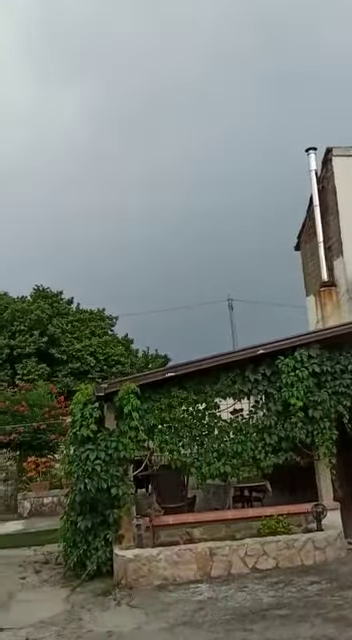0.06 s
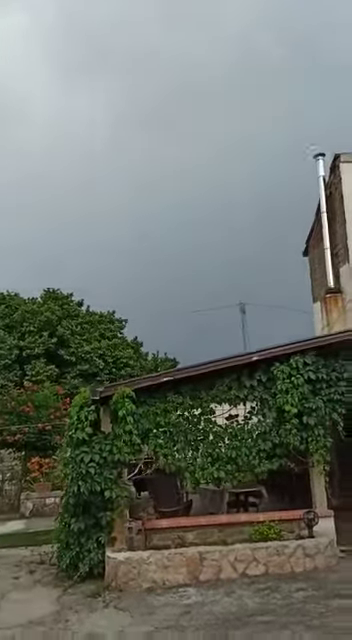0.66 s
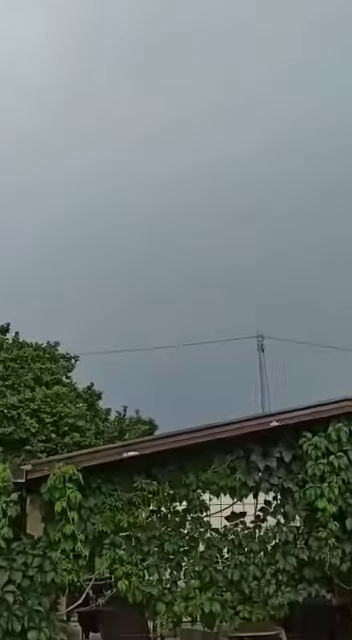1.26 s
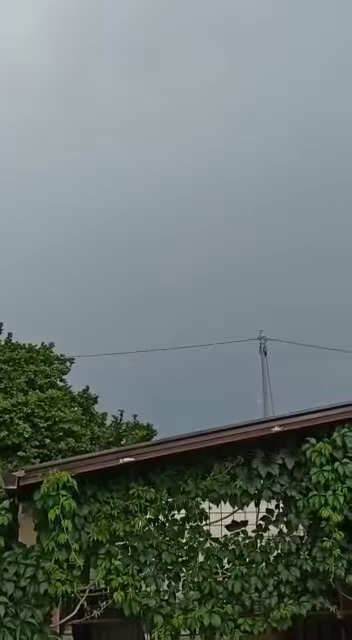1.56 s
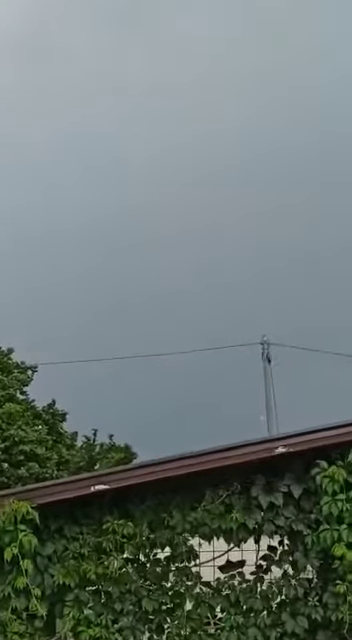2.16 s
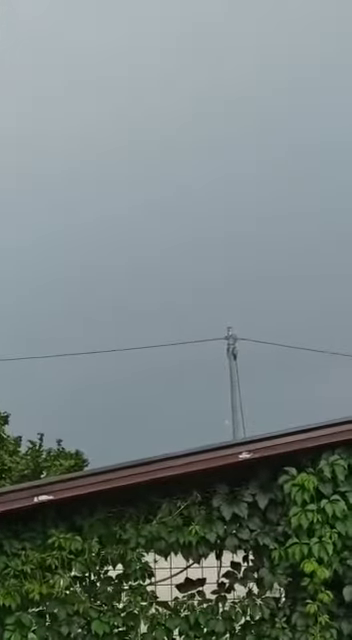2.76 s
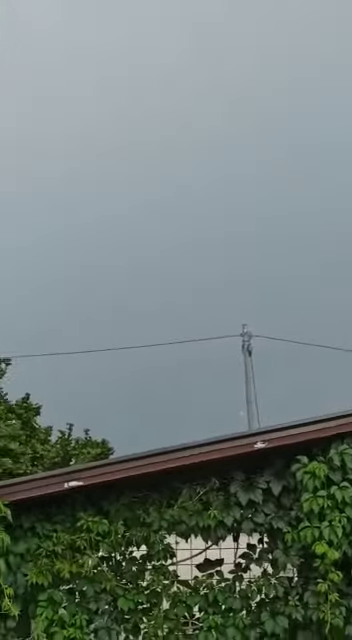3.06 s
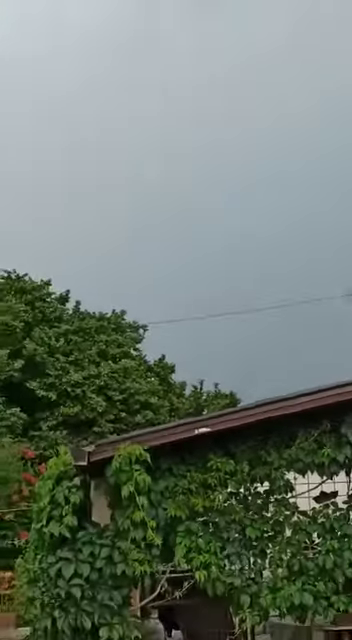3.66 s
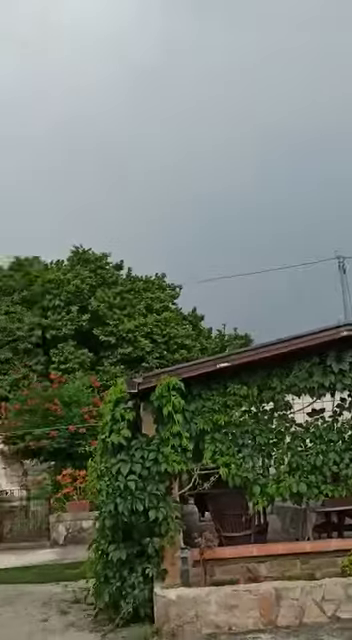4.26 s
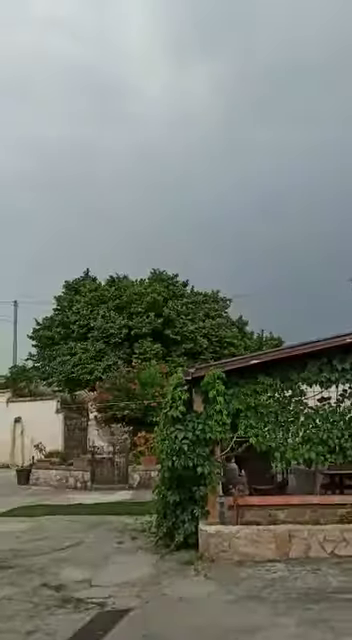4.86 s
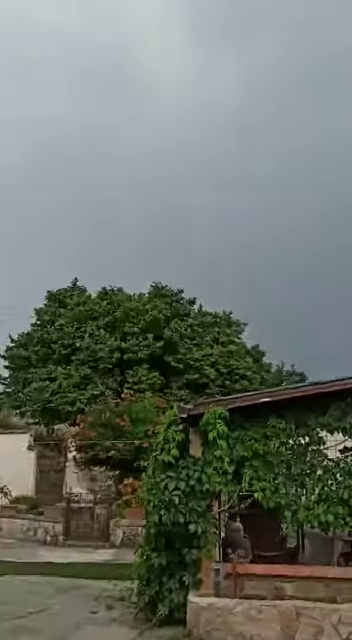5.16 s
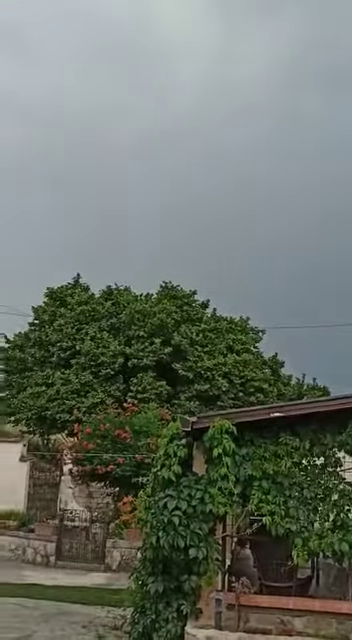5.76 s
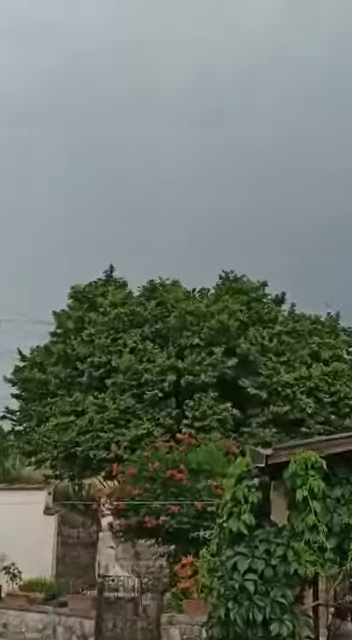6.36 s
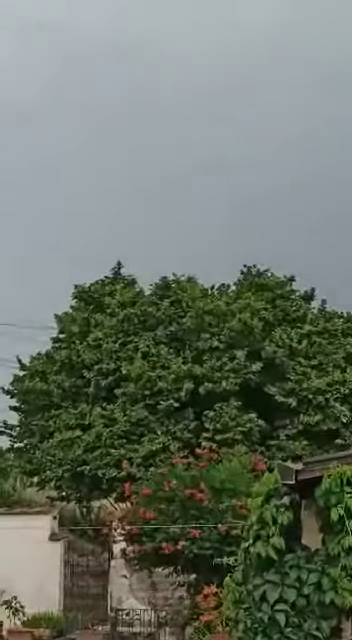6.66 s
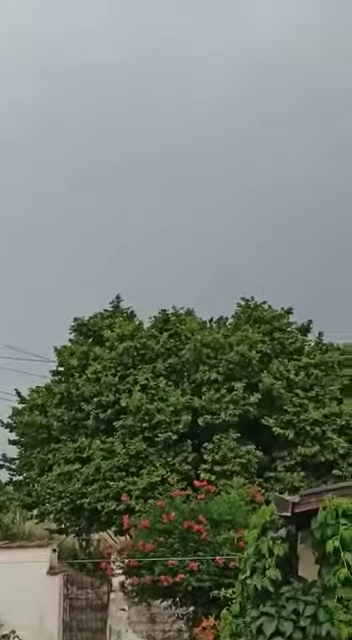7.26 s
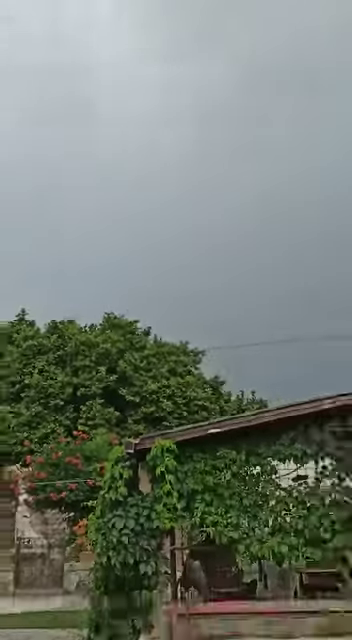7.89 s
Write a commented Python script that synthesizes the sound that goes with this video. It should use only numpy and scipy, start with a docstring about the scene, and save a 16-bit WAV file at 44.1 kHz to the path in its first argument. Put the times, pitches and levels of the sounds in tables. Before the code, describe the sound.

A vehicle drones closer, rattles past and pulls away with a booming exhaust, then another hums up with roaring tyres.

```python
"""A low, swelling rumble much like thunder: motor traffic rolling past a walled yard.
One vehicle drones closer, rattles by at three seconds and pulls away, its exhaust booming in swells
between the walls. A second follows with a softer engine hum, and the tyres of each roar and hiss on
the road. A few dry ticks sound near the microphone, and a bird peeps far off."""
import sys
import numpy as np
from scipy import signal
from scipy.fft import rfft, irfft
from scipy.io import wavfile
from scipy.ndimage import uniform_filter1d

SR = 44100
rng = np.random.default_rng(int(sys.argv[2]) if len(sys.argv) > 2 else 0)


def materialize(psi):
    """Save the field psi as 16-bit PCM at rate SR to the path in sys.argv[1].

    A 1-D psi becomes a single channel; in a 2-D psi each row is a channel.
    """
    bounded = np.clip(np.atleast_2d(psi).T, -1, 1)
    quanta = np.round(bounded * 32767).astype(np.int16)
    wavfile.write(sys.argv[1], SR, quanta)


N = 358533
TIME = np.arange(N) / SR
FIRST_PASS_S, SECOND_PASS_S = 3.078, 7.436  # when each vehicle is closest


def first_engine(octave_trim_db=-1, jitter_hz=0.611):
    """An exhaust boom, its even harmonics and rougher overtones, all locked to one unsteady crankshaft."""
    # The revs climb as it pulls away. Each row: time in seconds, firing rate in Hz.
    firing = [(2.82, 72.95), (2.98, 78.75), (3.07, 80.7), (3.3, 77.3), (3.6, 77.13), (3.95, 78.5),
              (4.3, 77.7), (4.8, 80.2), (5.0, 80.6), (5.25, 82.6), (5.6, 82.7), (5.8, 83.7), (6.2, 84.95),
              (7, 90.8), (8.13, 92.5)]
    # The boom swells between the walls. Each row: start and length in seconds, level in dB,
    # rise and fall in seconds.
    booms = [(2.599, 0.2, -36, 0.067, 0.071), (2.758, 0.65, -19.5, 0.37, 0.13),
             (3.27, .64, -22, 0.25, 0.15), (3.817, 0.22, -37, .06, 0.051), (4.004, 0.96, -23, 0.15, 0.23),
             (4.702, 0.88, -22.5, 0.63, 0.36), (5.483, 0.89, -21.5, 0.33, 0.32),
             (6.204, 0.55, -35.5, 0.13, 0.095), (6.72, 0.52, -38.5, 0.11, 0.12),
             (7.221, 1.15, -37, 0.13, .1)]
    # Swells of the octave. Each row: start and length in seconds, level in dB before the trim.
    octave_swells = [(2.892, 0.5, -25), (3.4, 0.38, -26), (3.725, 0.6, -28), (4.497, 0.47, -36.5),
                     (4.888, 0.28, -31), (5.173, 0.24, -24), (5.34, 0.31, -32), (5.562, 0.38, -26),
                     (6.08, 0.4, -35)]
    # The fourth harmonic comes and goes. Each row: start and length in seconds, level in dB.
    fourth_swells = [(3.525, 0.29, -32.5), (3.87, 0.34, -34.5), (4.375, 0.26, -27.5), (4.623, 0.42, -39),
                     (5.694, 0.35, -41)]
    # The machine's growl. Each row: multiple of the firing rate, relative level in dB, roughness 0-1.
    overtones = [(1.335, -10.5, .9), (1.498, -15.5, 0.6), (2.55, -14, 0.7), (2.87, -6, .6), (3.06, -3, .8),
                 (3.69, -1.5, 0.48), (4.05, -8.5, .6), (4.33, -11.5, 0.7)]
    turns = np.cumsum(follow(firing) + jitter_hz * wander(9.1)) / SR
    boom = swells(booms) * tone(turns, rough=0.075, flutter_hz=9.8)
    octave = swells(octave_swells, rise=0.088, fall=0.14) * tone(2 * turns, rough=0.18, flutter_hz=13)
    fourth = swells(fourth_swells, rise=0.11, fall=0.18) * tone(4 * turns, rough=0.42, flutter_hz=22)
    growl = sum(gain_of(db) * tone(k * turns, rough, flutter_hz=6.9) for k, db, rough in overtones)
    growl *= passing(FIRST_PASS_S, peak_db=-32, near_s=1.61, ahead=16.6, behind=1.67)
    return boom + gain_of(octave_trim_db) * octave + fourth + growl


def drive_train(panel_hz=438, panel_db=-19):
    """A drone, loudest as the first vehicle draws level, a higher ring it shakes loose, and a whirr."""
    # The drone's pitch. Each row: time in seconds, pitch in Hz.
    drone_pitch = [(1.3, 213), (1.8, 210), (2.3, 225), (2.5, 227.7), (2.7, 219.1), (2.95, 216.3),
                   (3.15, 224.9), (3.35, 220.4), (3.6, 218.8), (4.4, 223.2), (4.7, 227.5), (5.1, 235)]
    # Its swells. Each row: start and length in seconds, level in dB.
    drone_swells = [(1.227, 0.83, -42), (2.26, 0.41, -27.5), (2.534, .16, -30), (2.72, 0.51, -21),
                    (3.003, 0.15, -23.5), (3.21, 0.412, -23.5), (4.47, 0.34, -29), (4.802, 0.38, -40)]
    # A close whirr, perhaps the cooling fan. Each row: pitch in Hz, relative level in dB.
    whirr_tones = [(436, -37.5), (516, -38.5)]
    drone = glide(drone_pitch, rough=0.11, flutter_hz=30)
    panel = gain_of(panel_db) * tone(panel_hz * TIME, rough=0.56, flutter_hz=38)
    whirr = sum(gain_of(db) * tone(hz * TIME, rough=0.99, flutter_hz=6.4) for hz, db in whirr_tones)
    whirr *= passing(3.33, peak_db=1, near_s=0.51, ahead=4.1, behind=2.16)
    return swells(drone_swells, rise=0.068, fall=0.07) * (drone + panel) + whirr


def rumble():
    """Body and road rumble: a wake lingering behind each vehicle, gusts ahead of the first, a far bed."""
    # Colours of the wake, gusts and bed. Each row: frequency in Hz, relative density in dB.
    wake_colour = [(20, -23), (40, -32), (60, -11), (85, -1.5), (130, -1), (180, 1.5), (250, -1.5),
                   (310, -3.5), (400, -11), (650, -34.5), (1500, -84.5)]
    gust_colour = [(20, -29), (55, -25), (85, -3.5), (120, 3.5), (180, -2), (260, -8.5), (400, -27),
                   (1500, -88)]
    bed_colour = [(20, -25.5), (40, -29), (60, -11.5), (85, -4), (130, -2.5), (160, -1), (200, 0.5),
                  (235, 0), (270, -7), (400, -14), (650, -36), (1500, -80.5)]
    # The low gusts. Each row: start and length in seconds, level in dB, rise and fall in seconds.
    gust_swells = [(1.05, 1.37, -42, 0.31, .2), (2.1, 0.75, -31.5, 0.52, 0.23)]
    first = passing(FIRST_PASS_S, peak_db=-23.5, near_s=0.17, ahead=1.02, behind=0.6)
    first *= emerging(start=1.17, rise=0.28, hidden_db=-11)
    second = passing(SECOND_PASS_S, peak_db=-37.5, near_s=0.52, ahead=1.6, behind=0.1)
    wake = np.hypot(first, second) * noise(wake_colour, patchy_db=3, size=4096)
    gusts = swells(gust_swells) * noise(gust_colour, patchy_db=-1.5, size=4096)
    bed = gain_of(-41) * noise(bed_colour, patchy_db=1, size=4096)
    return wake + gusts + bed


def tyres(far_roar_db=-48, far_hiss_db=-71, grit_db=0.5):
    """Tyre roar and hiss rise and fall with each vehicle's distance; grit makes the hiss flicker."""
    # Colours of roar and hiss; the first vehicle passes closer, so its hiss is brighter.
    # Each row: frequency in Hz, relative density in dB.
    first_roar_colour = [(100, -32.5), (280, -8), (430, -0.5), (570, -1.5), (740, -3.5), (950, -6),
                         (1400, -11.5), (2100, -14), (2700, -27), (4500, -68)]
    second_roar_colour = [(100, -18), (280, -8), (430, 3), (700, 1.5), (950, 0.5), (1250, -1.5), (1550, -5),
                          (2100, -7.5), (2700, -23.5), (4500, -83.5)]
    bright_hiss_colour = [(900, -23.5), (2000, 5.5), (2800, 5), (4300, 5), (5300, -7.5), (6700, 2),
                          (8100, -1.5), (9200, -24.5), (10500, -41), (12500, -13), (16000, -24)]
    hiss_colour = [(900, -17.5), (2000, 4.5), (2800, 4.5), (4300, 4), (5300, -9.5), (6700, -0.5),
                   (8100, -8.5), (9500, -43), (12500, -25), (16000, -22.5)]
    # Brief surges, as over rougher ground. Each row: start and length in seconds,
    # roar and hiss levels in dB, rise and fall in seconds.
    surges = [(1.663, 0.36, -41, -48, 0.069, 0.23), (2.172, 0.65, -39, -47.5, 0.21, 0.092),
              (2.9, 0.22, -26, -42, 0.12, 0.11), (3.032, 0.29, -35, -45.5, .08, 0.18),
              (3.15, 0.56, -35.5, -51, .1, 0.32), (6.596, 0.57, -39, -48, 0.27, 0.27),
              (7.25, 0.56, -39, -57, 0.18, 0.23)]
    roar_surges = sum(swell(s, length, db, rise, fall) for s, length, db, _, rise, fall in surges)
    hiss_surges = sum(swell(s, length, db, rise, fall) for s, length, _, db, rise, fall in surges)

    first_roar = passing(FIRST_PASS_S, peak_db=-27, near_s=0.58, ahead=2.52, behind=1.284)
    second_roar = passing(SECOND_PASS_S, peak_db=-36, near_s=1.21, ahead=1.1, behind=1.9)
    second_roar *= emerging(start=4.22, rise=1.3, hidden_db=-30.5)
    roar = np.hypot(first_roar, gain_of(far_roar_db)) * noise(first_roar_colour, 0.98, size=2048)
    roar += np.hypot(second_roar, roar_surges) * noise(second_roar_colour, patchy_db=0.7)

    first_hiss = passing(FIRST_PASS_S, peak_db=-39.5, near_s=0.4, ahead=1.62, behind=1.3)
    alongside = swell(start=2.88, length=0.44, db=-40.5, rise=0.12, fall=0.2)
    second_hiss = passing(SECOND_PASS_S, peak_db=-48, near_s=1, ahead=1, behind=3.3)
    hiss_level = np.sqrt(second_hiss ** 2 + hiss_surges ** 2 + gain_of(far_hiss_db) ** 2)
    hiss = hiss_level * noise(hiss_colour, patchy_db=1.2)
    hiss += np.hypot(first_hiss, alongside) * noise(bright_hiss_colour, patchy_db=1.4)
    return roar + hiss * gain_of(grit_db * wander(70))


def body_rattle(jolts_per_s=280, jolt_rise_s=0.004, jolt_t60=0.055, spread_db=1):
    """The first vehicle's body shakes in a dense run of uneven, dull jolts, heard only close by."""
    # The rattling body's colour. Each row: frequency in Hz, relative density in dB.
    body_colour = [(150, -32), (280, -9), (420, -1), (600, 2), (850, -8), (1300, -24), (2600, -69)]
    hits = rng.random(N) < jolts_per_s / SR
    sizes = np.minimum(rng.exponential(1, N), 3)
    t = np.arange(SR // 5) / SR
    jolt = fade_in(t / jolt_rise_s) * gain_of(-60 * t / jolt_t60)
    shaking = signal.oaconvolve(hits * gain_of(spread_db * sizes), jolt)[:N]
    rattle = unit_rms(shaking * noise(body_colour, patchy_db=2.5))
    return swell(start=3, length=0.66, db=-30.5, rise=0.17, fall=0.3) * rattle


def second_engine(cruise_hz=57.47, ease_off_s=6.55, sag_hz_per_s=2.046):
    """The second vehicle hums in swells and eases off as it comes near."""
    # Swells of the hum. Each row: start and length in seconds, level in dB, rise and fall in seconds.
    hum_swells = [(4.5, 1.65, -45.5, 0.62, .3), (5.696, 1.48, -35, 0.51, 0.83), (6.748, 1.89, -34, 0.62, 1)]
    firing_hz = cruise_hz - sag_hz_per_s * np.maximum(TIME - ease_off_s, 0)
    return swells(hum_swells) * cruising_hum(firing_hz, fundamental_db=-11, third_db=-7.5, fourth_db=-15)


def cruising_hum(firing_hz, fundamental_db, third_db, fourth_db):
    """An engine at light load: the second harmonic carries the hum, the others sit below it."""
    turns = np.cumsum(firing_hz) / SR
    hum = tone(2 * turns, rough=0.17, flutter_hz=8.8)
    hum += gain_of(fundamental_db) * tone(turns, rough=0.15, flutter_hz=4)
    hum += gain_of(third_db) * tone(3 * turns, rough=0.6, flutter_hz=9)
    hum += gain_of(fourth_db) * tone(4 * turns, rough=0.45, flutter_hz=3.8)
    return hum


def tread_song(width_hz=130, stereo_spread=0.22):
    """The tread pattern sings on the road: a fuzzy band whose centre moves with speed and angle."""
    # The band's path. Each row: time in seconds, centre in Hz, level in dB.
    band = [(3.6, 901.6, -50.5), (4.6, 919, -45), (5.6, 910, -55), (6.4, 911.4, -48.5), (6.95, 1016, -39.5),
            (7.2, 1050, -42.5), (7.55, 757.5, -41.5), (8.13, 768.4, -45)]
    carrier = np.exp(2j * np.pi * np.cumsum(follow(band)) / SR)
    middle, side = (unit_rms((carrier * flutter(width_hz)).real) for _ in range(2))
    return fader(band) * np.array([middle + stereo_spread * side, middle - stereo_spread * side])


def ticks(knock_hz=470, knock_t60=0.005, knock_delay_s=0.00077,
          rasp_t60=0.009, scatter_db=-39, scatter_t60=0.15):
    """Each close tick is a brief ring, a dull knock and a dry rasp; faint rustles lie around the first."""
    # The ticks. Each row: start in seconds, level in dB, ring pitch in Hz, ring t60 and attack
    # in seconds, knock and rasp in dB relative to the ring.
    hits = [(0.109, -32, 4400, 0.006, .0002, -25, -20), (0.1106, -33, 4600, 0.005, .0003, -25, -17),
            (0.4808, -29, 3000, .002, .0002, -10, -22), (0.4848, -12.5, 2900, 0.002, 0.00014, -2.5, -41),
            (4.3191, -16.5, 4200, 0.0028, .0005, -28, -29)]
    # The rustles. Each row: start and length in seconds, level in dB.
    rustles = [(0, 0.19, -55), (0.442, 0.23, -56.5), (.76, 0.15, -61), (1.145, 0.19, -60)]
    # The dry rasp of both. Each row: frequency in Hz, relative density in dB.
    rasp_colour = [(500, -26), (2000, 1.5), (4200, -3.5), (5300, -11), (6500, 1.5), (8200, -6), (9500, -38),
                   (12500, -14), (16000, -11)]
    rasp = noise(rasp_colour, patchy_db=2.5, size=256)
    out = rasp * swells(rustles, rise=0.034, fall=0.072)
    t = np.arange(SR // 5) / SR
    late = np.maximum(t - knock_delay_s, 0)
    knock = -np.sin(2 * np.pi * knock_hz * late) * gain_of(-60 * late / knock_t60)
    for start, db, hz, t60, attack_s, knock_db, rasp_db in hits:
        span = slice(round(start * SR), round(start * SR) + len(t))
        ring = np.sin(2 * np.pi * hz * t) * gain_of(-60 * t / t60)
        tail = gain_of(rasp_db - 60 * t / rasp_t60) + gain_of(scatter_db - 60 * t / scatter_t60)
        tick = ring + gain_of(knock_db) * knock + tail * rasp[:, span]
        out[:, span] += gain_of(db) * fade_in(t / attack_s) * tick
    return out


def far_engine():
    """A distant engine hums through the opening second."""
    # The hum. Each row: time in seconds, firing rate in Hz, level in dB.
    hum = [(0, 56.8, -39.5), (.3, 58.45, -45.5), (.6, 58.5, -38), (.8, 57.9, -43.5), (1.0, 58.5, -67)]
    return fader(hum) * cruising_hum(follow(hum), fundamental_db=-31, third_db=-22, fourth_db=-8.5)


def approach_tones():
    """A low tone sags as the first vehicle closes in, and a faint moan sounds as it comes out."""
    # The two tones. Each row: time in seconds, pitch in Hz, level in dB.
    sag = [(1.2, 77.7, -61), (1.75, 73.7, -53), (2.3, 58.3, -48), (2.7, 57.6, -52), (3.3, 50.3, -59)]
    moan = [(1.65, 358, -66), (1.82, 362, -43), (2.05, 367.3, -52.5), (2.3, 369.5, -41), (2.5, 368, -51)]
    low = fader(sag) * glide(sag, rough=0.5, flutter_hz=4.6)
    return low + fader(moan) * glide(moan, rough=0.55, flutter_hz=14)


def far_whine():
    """A thin whine wavers in the distance."""
    # The whine. Each row: time in seconds, pitch in Hz, level in dB.
    whine = [(.2, 1350, -63.5), (.45, 1315, -58), (.9, 1345, -66), (1.2, 1254, -62), (1.5, 1285, -67)]
    return fader(whine) * glide(whine, rough=0.9, flutter_hz=25)


def bird():
    """A far bird peeps in tiny arches of pure tone."""
    # The peeps. Each row: start in seconds, pitch in Hz, level in dB, length in seconds.
    peeps = [(4.455, 6380, -55, 0.03), (5.185, 6280, -53, 0.022), (5.736, 6280, -43, 0.026),
             (5.779, 6330, -53, 0.015)]
    out = np.zeros(N)
    for start, hz, db, length in peeps:
        arch = np.sin(np.pi * np.clip((TIME - start) / length, 0, 1))
        out += gain_of(db) * arch * np.sin(2 * np.pi * hz * TIME)
    return out


def open_air(level_db=-51.5):
    """A soft wash of outdoor air under everything."""
    # The air's colour. Each row: frequency in Hz, relative density in dB.
    air_colour = [(20, -12.5), (50, -9.5), (120, -2.5), (250, 4), (450, -14.5), (800, -4.5), (1400, -6.5),
                  (2500, -23.5), (4200, -17), (5400, -26), (6800, -16), (8200, -20), (9500, -55.5),
                  (12500, -27.5), (16000, -32.5)]
    return gain_of(level_db) * noise(air_colour, patchy_db=3)


def passing(closest_s, peak_db, near_s, ahead, behind):
    """Pass-by gain: close for about near_s, falling with distance to the power ahead, then behind."""
    distance = np.hypot(1, (TIME - closest_s) / near_s)
    return gain_of(peak_db) / distance ** np.where(TIME < closest_s, ahead, behind)


def emerging(start, rise, hidden_db):
    """Gain of a source that comes out from behind a wall."""
    hidden = gain_of(hidden_db)
    return hidden + (1 - hidden) * fade_in((TIME - start) / rise)


def fade_in(progress):
    """An S-shaped fade from 0 to 1."""
    return np.sin(np.pi / 2 * np.clip(progress, 0, 1)) ** 2


def swell(start, length, db, rise, fall):
    """A gain that rises smoothly and falls away; times are in seconds."""
    return gain_of(db) * fade_in((TIME - start) / rise) * fade_in((start + length - TIME) / fall)


def swells(rows, **fades):
    """A run of swells summed into one envelope."""
    return sum(swell(*row, **fades) for row in rows)


def follow(rows, column=1):
    """One column of a timed curve at every sample."""
    rows = np.array(rows)
    return np.interp(TIME, rows[:, 0], rows[:, column])


def fader(rows, fade_s=0.47):
    """A curve's dB column as a gain that fades out beyond its ends."""
    outside = np.maximum(rows[0][0] - TIME, 0) + np.maximum(TIME - rows[-1][0], 0)
    return gain_of(follow(rows, column=2)) * np.exp(-outside / fade_s)


def wander(hz):
    """Random drift of rms 1, moving up to about hz times a second."""
    f = np.fft.rfftfreq(N, 1 / SR)
    return unit_rms(irfft(rfft(rng.standard_normal(N)) / (1 + (f / hz) ** 4), N))


def flutter(hz):
    """Complex drift that shakes both level and phase."""
    return wander(hz) + 1j * wander(hz)


def tone(turns, rough, flutter_hz):
    """A tone of rms 1 whose level and phase flutter by the share rough."""
    wobble = 1 + rough * flutter(flutter_hz)
    return unit_rms((wobble * np.exp(2j * np.pi * (turns + rng.random()))).real)


def glide(rows, rough, flutter_hz):
    """A fluttering tone that follows a pitch curve."""
    return tone(np.cumsum(follow(rows)) / SR, rough, flutter_hz)


def noise(colour, patchy_db, size=1024):
    """Stereo coloured noise with drifting patches, centred in the bass and wide in the treble."""
    # How alike the two microphone ports are. Each row: frequency in Hz, coherence 0-1.
    coherence = [(60, 0.99), (290, 0.96), (640, 0.9), (1400, 0.69), (2400, 0.19), (4000, 0.039),
                 (7000, 0.026)]
    hz, hop = np.fft.rfftfreq(size, 1 / SR), size // 4
    a, b, c, d, patches = rng.standard_normal((5, N // hop + 5, len(hz)))
    patches = uniform_filter1d(patches, size=10, axis=0)  # smooth in time
    patches = unit_rms(uniform_filter1d(patches, size=12, axis=1))  # then in frequency
    alike = np.clip(curve_at(coherence, hz), 0, 1)
    left = a + 1j * b
    right = alike * left + np.sqrt(1 - alike ** 2) * (c + 1j * d)
    spectra = np.array([left, right]) * gain_of(curve_at(colour, hz) + patchy_db * patches)
    _, ports = signal.istft(spectra.transpose(0, 2, 1), nperseg=size, noverlap=size - hop)
    return unit_rms(ports[:, :N])


def curve_at(points, hz):
    """A spectrum's value at hz, on a log-frequency axis."""
    f, value = np.transpose(points)
    return np.interp(np.log(hz + 1), np.log(f + 1), value)


def gain_of(db):
    """Decibels to amplitude."""
    return 10 ** (np.asarray(db) / 20)


def unit_rms(x):
    """Scales to an rms of 1."""
    return x / np.sqrt(np.mean(x ** 2) + 1e-20)


def scene():
    """Engines and rumble sit in the middle; tyres and open air spread wide."""
    engines = first_engine() + drive_train() + second_engine() + approach_tones() + far_engine()
    traffic = engines + rumble() + body_rattle() + tyres() + tread_song()
    return traffic + open_air() + far_whine() + bird() + ticks()


def record(dry, left_lead_s=7e-5, cutoff_hz=15800):
    """Sound reaches the left port just before the right; each has its own colour and loses the very top."""
    # The left port's colour against the right. Each row: frequency in Hz, level in dB.
    balance = [(100, 0.33), (700, 0), (1300, -1), (2400, -2.5), (4400, 0.9), (8000, 1), (13000, -1)]
    hz = np.fft.rfftfreq(N, 1 / SR)
    half = gain_of(curve_at(balance, hz) / 2) * np.exp(1j * np.pi * hz * left_lead_s)
    ports = irfft(rfft(dry) * np.array([half, 1 / half]), N)
    lowpass = signal.firwin(511, cutoff_hz, window=("kaiser", 9), fs=SR)
    return signal.oaconvolve(ports, lowpass[None], "same")


dry = scene()
out = record(dry)
materialize(out)
```